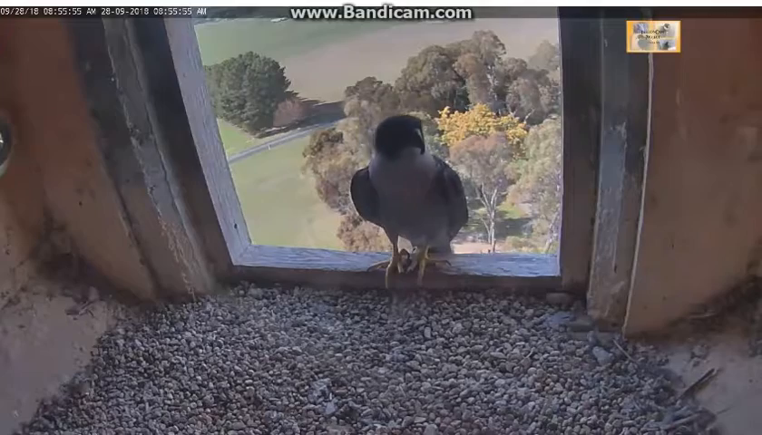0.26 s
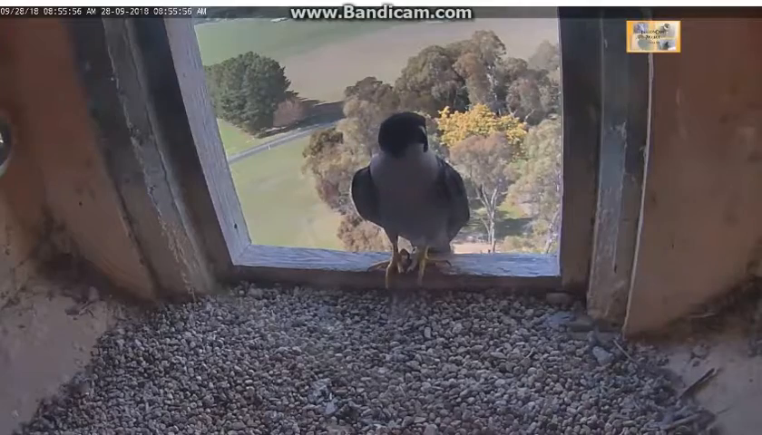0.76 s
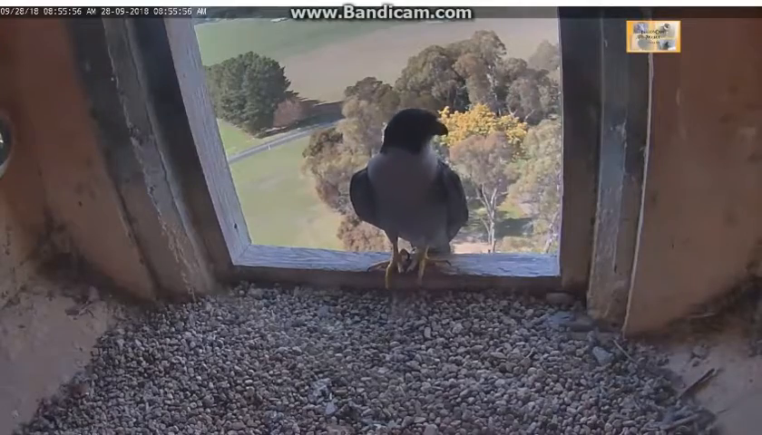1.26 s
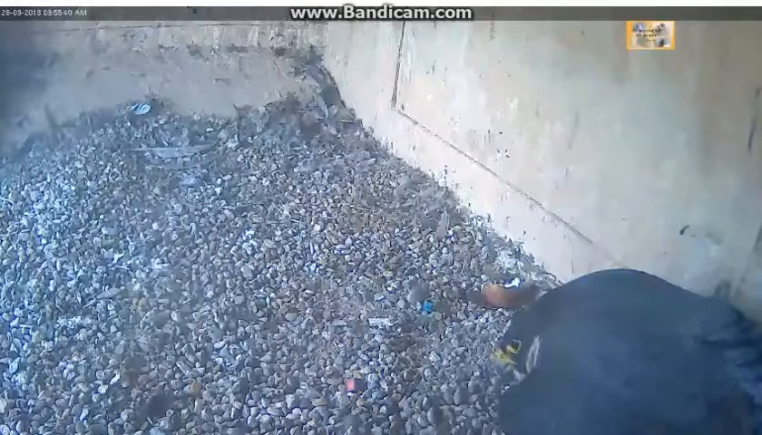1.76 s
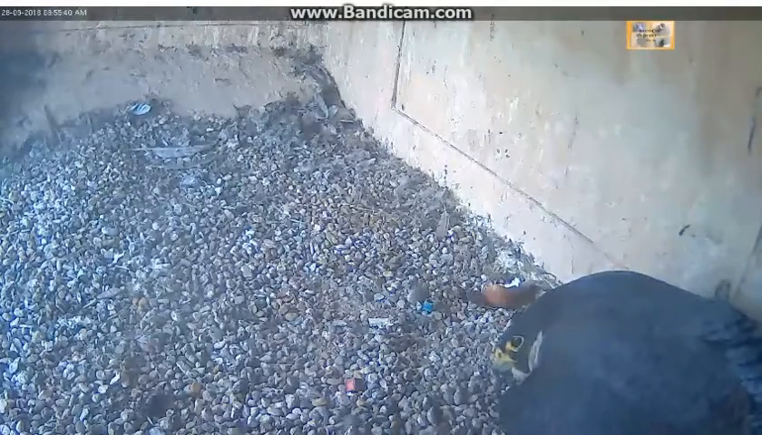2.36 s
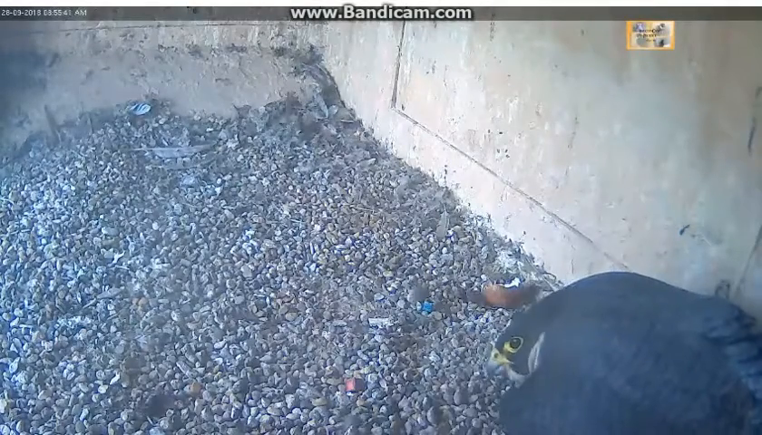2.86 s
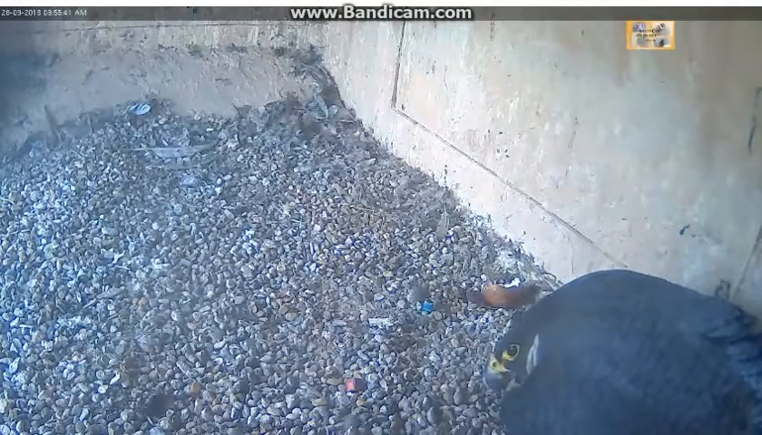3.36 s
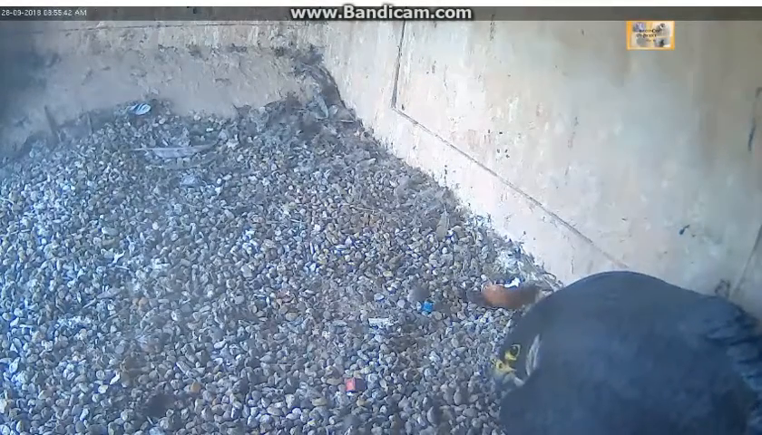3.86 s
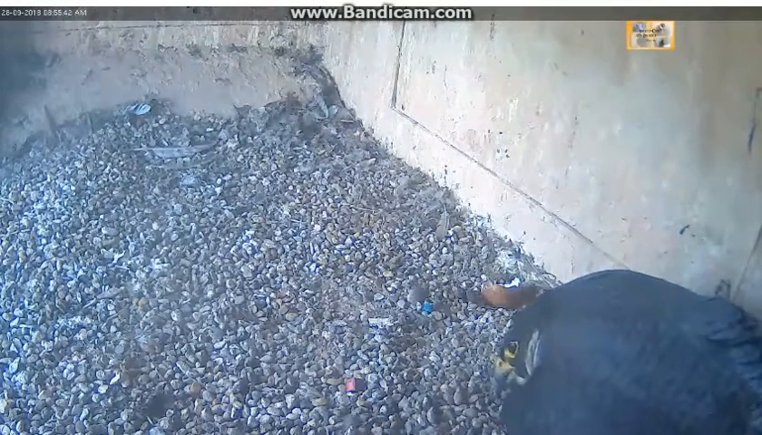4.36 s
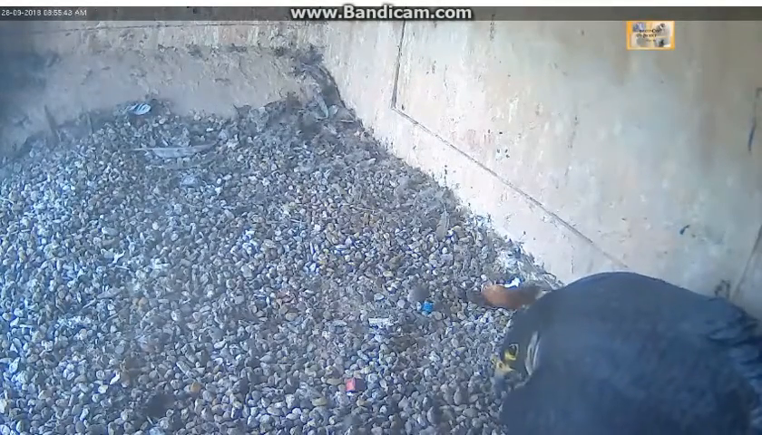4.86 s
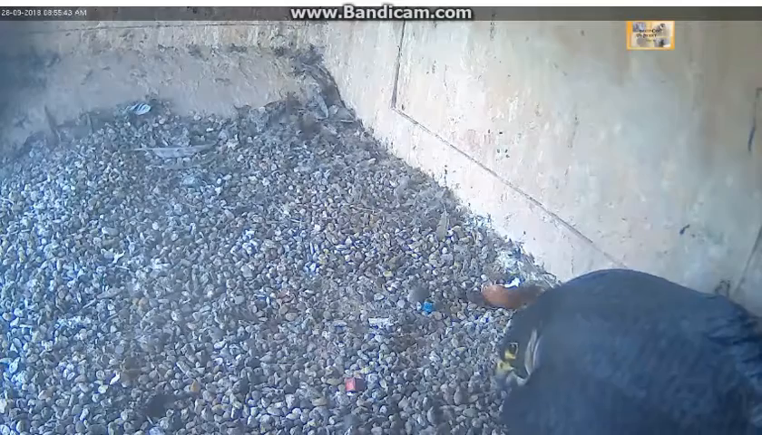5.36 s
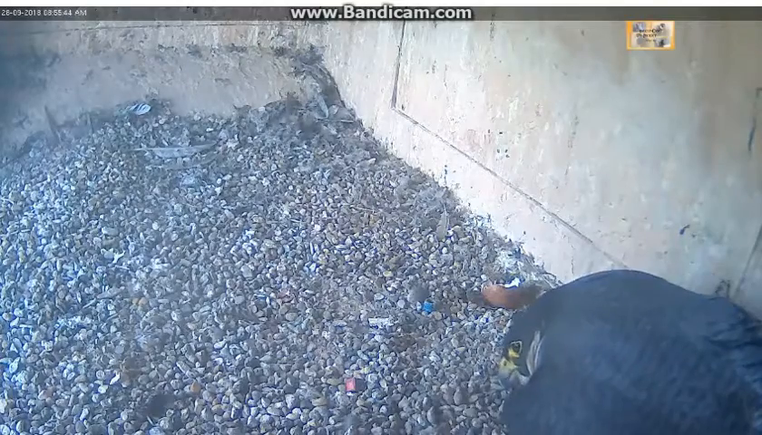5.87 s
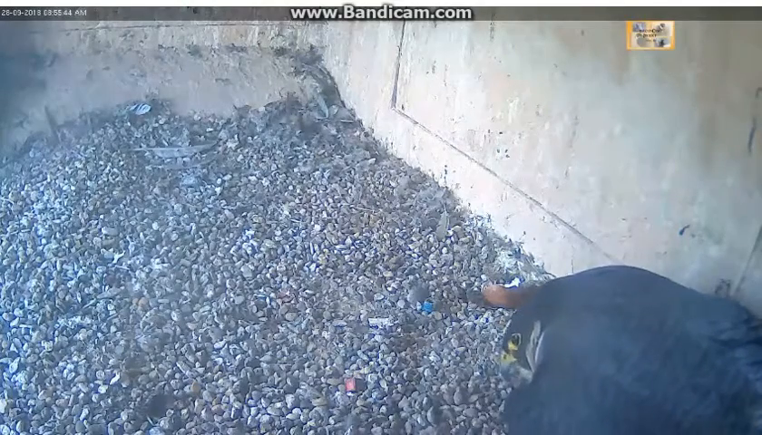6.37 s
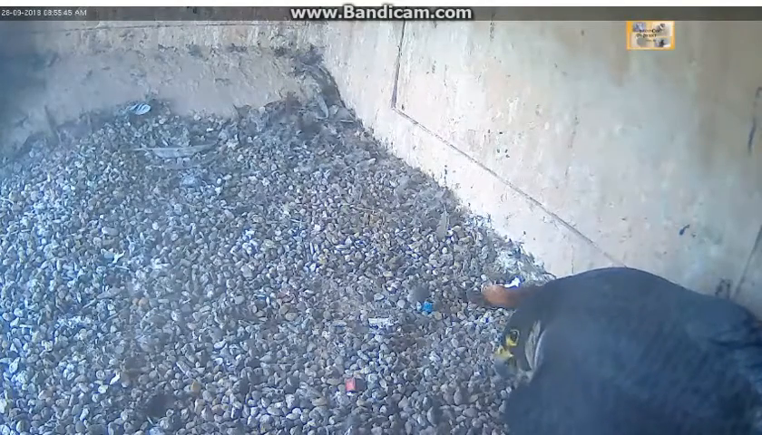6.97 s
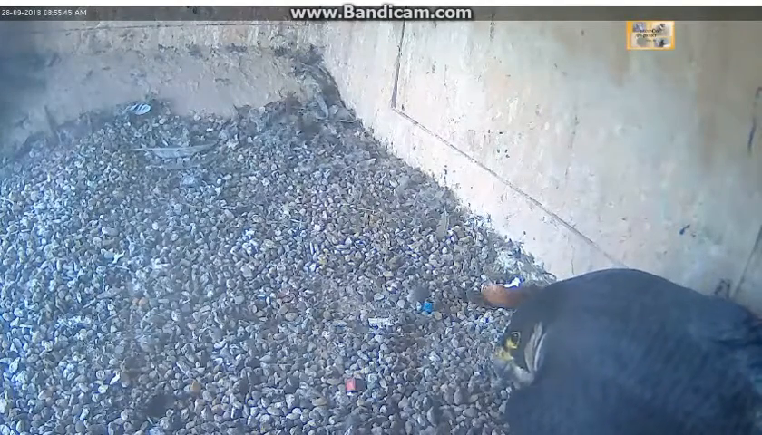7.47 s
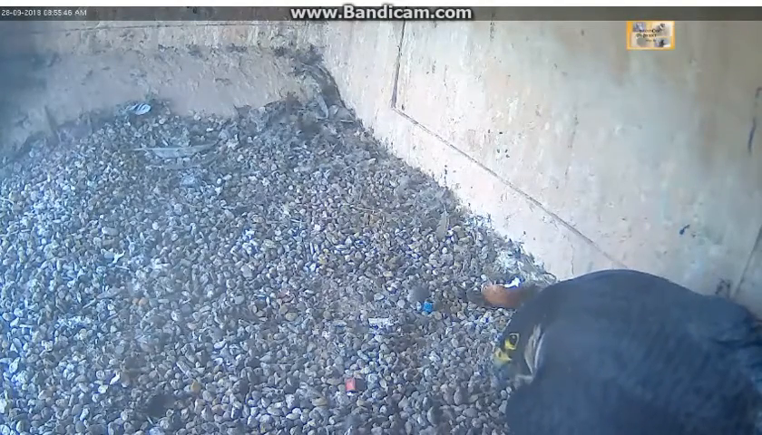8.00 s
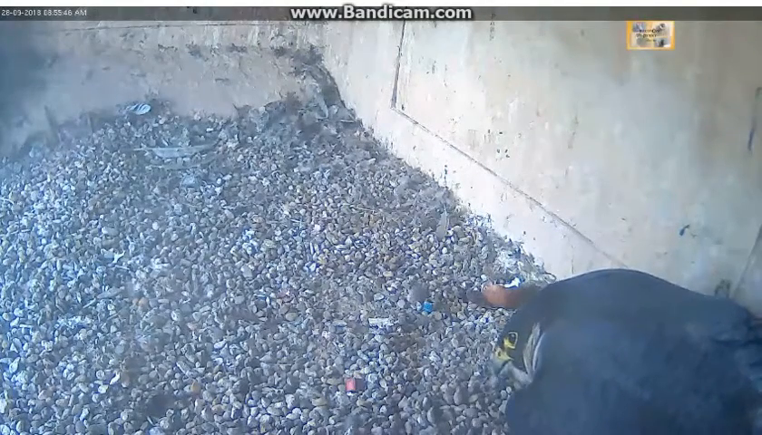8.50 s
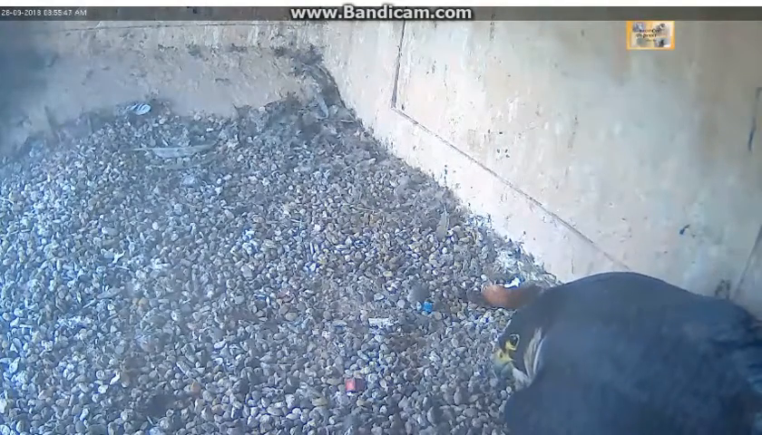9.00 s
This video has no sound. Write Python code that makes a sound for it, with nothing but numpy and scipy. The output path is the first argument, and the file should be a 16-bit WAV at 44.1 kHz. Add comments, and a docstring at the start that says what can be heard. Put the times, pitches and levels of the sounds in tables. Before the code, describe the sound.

Quiet air with one soft cry, then an abrupt switch to a falcon beside a small microphone in a nest box. Buzzing rasps come first, then harsh, piercing calls follow quickly until the end. Some begin with a low pulsed bark, others with a thin rising whistle; the pitch drops into a brief growl. Short close echoes, a slowly growing low hum and an uneven hiss accompany them.

```python
"""A falcon gives a run of sharp 'ee-chup' calls in a nest box, right beside a small microphone.
Some calls open with a low pulsed bark, most directly with a thin rising whistle; then the pitch
plunges and ends as a growl. It starts with one faint cry in quiet air; then the listening point jumps
close to the bird, which rasps a few times before the run. From there on a low hum and a ringing hiss
lie under the calls. Voices are harmonics and noise, whistles are sines, the background is coloured noise."""
import sys
import numpy as np
from scipy import signal
from scipy.fft import rfft, irfft, next_fast_len
from scipy.io import wavfile
from scipy.ndimage import uniform_filter1d, minimum_filter1d

SR = 44100
rng = np.random.default_rng(int(sys.argv[2]) if len(sys.argv) > 2 else 0)


def transcribe(u):
    """Save the signal u as a 16-bit wav file named by the first command-line argument.

    u: samples, shape (n,) or (channels, n), limited to [-1, 1]; the rate is SR.
    q: integer samples, one column per channel.
    """
    v = np.clip(np.atleast_2d(u).T, -1, 1)
    q = np.round(v * 32767).astype(np.int16)
    wavfile.write(sys.argv[1], SR, q)


N = 407484
TIME = np.arange(N) / SR
VOICE_TOP_HZ = 7900


def from_db(db):
    """Decibels to gain."""
    return 10 ** (np.asarray(db) / 20)


def rms_one(x):
    """Scale to rms 1."""
    return x / np.sqrt(np.mean(x ** 2) + 1e-20)


def gain_at(spectrum, hz):
    """Read the gain of a colour; beyond its ends it falls by 72 dB per octave."""
    points, db = np.transpose(spectrum)
    octave, edge = np.log2(np.maximum(hz, 1)), np.log2(points)
    beyond = np.abs(octave - np.clip(octave, edge[0], edge[-1]))
    return from_db(np.interp(octave, edge, db) - 72 * beyond)


def coloured(n, spectrum):
    """Noise of a given colour, rms 1."""
    size = next_fast_len(n)
    white = rfft(rng.standard_normal(size))
    shaped = white * gain_at(spectrum, np.fft.rfftfreq(size, 1 / SR))
    return rms_one(irfft(shaped, size)[:n])


def wander(t, rate):
    """Smooth chance through a short note, with `rate` new values a second."""
    return np.interp((t - t[0]) * rate, np.arange(512), rng.standard_normal(512))


def resonate(x, hz, width):
    """One resonance, gain 1 on top."""
    r = np.exp(-np.pi * width / SR)
    feed = np.array([1, 0, -1]) * (1 - r * r) / 2
    feedback = [1, -2 * r * np.cos(2 * np.pi * hz / SR), r * r]
    return signal.lfilter(feed, feedback, x + 1e-18)


def sine_phase(pitch):
    """Add up a changing pitch in Hz to the phase of its wave."""
    return 2 * np.pi * np.cumsum(pitch) / SR


def add(track, t, note):
    """Mix a note in at its times."""
    at = np.round(t * SR).astype(int)
    inside = (at >= 0) & (at < N)
    track[at[inside]] += note[inside]


def span(start, end):
    """Sample times from start to end."""
    return np.arange(round(start * SR), round(end * SR)) / SR


def course(shape, start, length, jitter):
    """Stretch the course of a note over its length: times, unsteady pitch, gain."""
    share, hz, db = np.transpose(shape)
    knots = start + np.sort(share) * length
    t = span(knots[0], knots[-1])
    pitch = np.exp(np.interp(t, knots, np.log(hz)) + jitter * wander(t, 695.3))
    return t, pitch, from_db(np.interp(t, knots, db))


def arch(start, length, first, middle, last, swell_db, jitter, catch, edge_s, sag_db):
    """A tone on an arched pitch, unsteadiest where it starts and ends: times, phase, gain."""
    t = span(start - edge_s / 2, start + length + edge_s)
    u = np.clip(2 * (t - start) / length - 1, -1, 1)  # -1 at the start, 1 at the end
    pitch = middle + (last - first) / 2 * u + ((first + last) / 2 - middle) * u * u
    pitch = pitch * (1 + (jitter + catch * u ** 4) * wander(t, 1300))
    fade_in = np.clip((t - t[0]) / (1.2 * edge_s), 0, 1)
    fade_out = np.clip((t[-1] - t) / (2 * edge_s), 0, 1)
    gain = np.sin(np.pi / 2 * fade_in * fade_out) ** 2 * from_db(swell_db * u - sag_db * u * u)
    return t, sine_phase(pitch), gain


def syrinx(pitch, colour, rough, flicker_db=4.5, size=8192):
    """Pulses from the voice organ, with air noise let through on each cycle, shaped by the throat; rms 1."""
    phase, t = sine_phase(pitch), np.arange(len(pitch)) / SR
    pulses = 0
    for k in range(1, int(VOICE_TOP_HZ / pitch.min()) + 1):
        # each harmonic has its own delay and flickers on its own
        weight = gain_at(colour, k * pitch) * from_db(flicker_db * wander(t, 262.6))
        pulses = pulses + weight * np.cos(k * phase + rng.normal())
    # a pitch-dependent gain: higher moments are raised against lower ones
    pulses = pulses / np.sqrt(np.maximum(pitch.min() / pitch, .3))
    air = np.resize(coloured(size, colour), len(pitch)) * (1 + np.cos(phase))
    return rms_one(rms_one(pulses) + rough * rms_one(air))


def singing_noise(spectrum, tones):
    """Smooth noise with narrow noisy bands standing out of it; rms 1."""
    total = coloured(N, spectrum)
    for hz, width, db in tones:
        band = rng.standard_normal(N)
        for _ in range(2):
            band = resonate(band, hz, 1.3 * width)
        total = total + from_db(db) * rms_one(band)
    return rms_one(total)


# smooth noise of the quiet air, the hum and the hiss: (f/Hz, relative level/dB per Hz)
FAR_AIR_COLOUR = [(15, -29), (25, -14), (43, -3), (65, 1), (124, -8.5), (196, -1.5), (280, -10.5),
                  (373, -26.5), (522, -39.5), (926, -42), (1290, -28), (1460, -32.5), (3890, -32),
                  (5980, -23.5), (7600, -38), (9880, -71), (16700, -120)]
HUM_COLOUR = [(15, -37.5), (25, -18.5), (43, -14.5), (64, -4.5), (107, -15), (168, -5.5), (204, -12),
              (301, -2.5), (320, -10), (350, -9.5), (533, -35), (900, -40.5), (1170, -58), (1980, -120)]
HISS_COLOUR = [(530, -49.5), (900, -31), (1070, -22.5), (1390, -12.5), (1700, -16), (2000, -20),
               (2110, -10), (2200, -6), (2750, -13.5), (3620, -11), (4100, -25.5), (4810, -18.5),
               (5400, -24.5), (7050, -16), (7500, -40), (9750, -50.5), (16500, -120)]
# bands that sing in each: (f/Hz, width/Hz before the filter pair is set, level/dB against the smooth noise)
AIR_TONES = [(1250, 86, -30), (4740, 85, -21.5)]
HUM_TONES = [(273.1, 4.6, 0.5), (314, 8.2, -4)]
HISS_TONES = [(1422, 120, -9), (2213, 110, 0), (4300, 100, -14), (6000, 160, -19), (7270, 22, -9.5)]
# how loud the hiss is through time: (t/s, level/dB)
HISS_LEVEL = [(1.5, -47), (2.099, -51), (2.6, -44), (2.87, -51.5), (3.1, -43.5), (9.24, -47.5)]
CLOSE_S = 1.422  # the listening point jumps close
FAR_AIR_DB = -57
HUM_DB, HUM_RISE_DB_PER_S = -42, 0.74  # the level at CLOSE_S, and its slow growth


def background():
    """Faint air noise gives way to a slowly growing hum and an uneven hiss, all of them filtered noise."""
    s, hiss_db = np.transpose(HISS_LEVEL)
    hum_gain = from_db(HUM_DB + HUM_RISE_DB_PER_S * (TIME - CLOSE_S))
    near = hum_gain * singing_noise(HUM_COLOUR, HUM_TONES)
    near += from_db(np.interp(TIME, s, hiss_db)) * singing_noise(HISS_COLOUR, HISS_TONES)
    far = from_db(FAR_AIR_DB) * singing_noise(FAR_AIR_COLOUR, AIR_TONES)
    close = np.clip((TIME - CLOSE_S) / 0.0078, 0, 1)
    return close * near + (1 - close) * far


# tones at which the box rings on: (f/Hz, width/Hz, level/dB)
BOX_MODES = [(276.6, 15, 8.5), (324.2, 14.6, 8.5), (1433, 39, 8.5), (2122, 32.6, 10.5), (2960, 70, 5.5)]
# wall reflections cancel at the microphone: (f/Hz, width/Hz, depth 0-1)
BOX_DIPS = [(542, 424, 0.96), (1194, 75, 0.8), (2344, 260, 0.8), (3127, 48, 0.5)]
BOX_T60_S, BOX_DB = 0.057, -5.5  # time for the echo to fall by 60 dB, and its level


def box(x, size=16384):
    """Direct sound, a short dense echo from close walls, and a few modes that ring on."""
    t = np.arange(size) / SR
    echo = rng.standard_normal(size) * from_db(-60 * t / BOX_T60_S) * (t > .002)
    walls = signal.fftconvolve(x, echo / np.linalg.norm(echo))[:N]
    ringing = sum(from_db(db) * resonate(x, hz, width) for hz, width, db in BOX_MODES)
    heard = from_db(-0.65) * x + from_db(BOX_DB) * walls + ringing
    for hz, width, depth in BOX_DIPS:
        heard = heard - np.clip(depth, 0, 1) * resonate(heard, hz, width)
    return heard


JOINED_S = .2


def after_bark(start):
    """Whether a plunge follows a bark so soon that both belong to one call."""
    return any(0 < start - bark[0] < JOINED_S for bark in BARKS)


# colour of the breath: (f/Hz, level/dB)
PUFF_COLOUR = [(900, -19.5), (2200, -21.5), (3300, -13.5), (4200, -9.5), (5100, -21), (6100, 2),
               (7100, -6.5), (7900, -34.5)]
RISING_PUFF_DB, CRY_PUFF_DB = -25, -26.5  # at the start of a call without a bark, or of a cry


def puffs(rise_s=0.0016, decay_s=0.017, size=4096):
    """Breath hisses briefly as the syrinx locks on to a note; a puff before a cry is never set above its cry's
    level, one before a call has a fixed level."""
    out, t = np.zeros(N), np.arange(size) / SR
    catches = [(start - lead, RISING_PUFF_DB)
               for start, _, _, _, lead, _ in CHUPS if not after_bark(start)]
    catches += [(start, min(CRY_PUFF_DB, db)) for start, _, _, depth, db in CRIES if depth > 0]
    for start, db in catches:
        swell = np.minimum(t / rise_s, 1) * np.exp(-t / decay_s)
        add(out, start + t, from_db(db) * swell * coloured(size, PUFF_COLOUR))
    return out


# lower arched cries: (t/s, length/s, mid pitch f/Hz, depth of the arch as share of pitch, level/dB)
CRIES = [(.001, 0.073, 2300, 0.01, -49), (1.727, 0.031, 2220, 0.13, -32.5),
         (1.795, 0.019, 2030, 0.15, -30.5), (2.09, 0.071, 2487, .055, -24.5),
         (2.186, 0.046, 2092, 0.06, -26.5), (2.448, 0.067, 2427, 0.17, -20.5),
         (2.785, 0.033, 2780, 0, -2.5), (2.817, 0.045, 2594, 0, -25.5), (2.985, 0.088, 2365, .18, -21.5),
         (3.432, 0.049, 2790, 0.01, -13), (5.205, 0.069, 2482, .1, -10), (6.137, 0.028, 2393, 0.04, -25),
         (6.598, 0.074, 2385, 0.15, -15.5), (7.161, 0.014, 2720, 0.01, -7), (7.169, 0.021, 2315, 0, -16.5),
         (8.541, 0.035, 2810, 0.03, -31)]
# the throat during a cry: (f/Hz, level/dB)
CRY_THROAT = [(2050, -3.5), (2450, 1.5), (2800, 0), (4100, 0), (4900, -1), (5500, 5), (6200, 5.5),
              (7100, 3.5), (7450, -8.5), (7800, -21)]
CRY_FALL_HZ, CRY_SWELL_DB = 217, -3  # pitch drop from start to end; level step from first to second half


def cries(flutter_db=3.5, hoarse=0.15):
    """Up to three harmonics, lower than the whistles, follow a sinking arch with a hoarse edge."""
    out = np.zeros(N)
    for start, length, hz, depth, db in CRIES:
        ends, sink = hz * (1 - depth), CRY_FALL_HZ / 2
        t, phase, gain = arch(start, length, ends + sink, hz, ends - sink, CRY_SWELL_DB,
                              jitter=0.0024, catch=0.015, edge_s=0.0086, sag_db=7.0)
        # soft cries are the hoarse ones
        shimmer = 1 + hoarse * wander(t, 1800) * np.clip(-db / 20, 0, 1) ** 2
        for k in range(1, 4):
            if k * hz < VOICE_TOP_HZ:
                strength = gain_at(CRY_THROAT, k * hz) * from_db(db + flutter_db * wander(t, 204.5))
                add(out, t, gain * shimmer * strength * np.sin(k * phase))
    return out


# hoarse notes: (t/s, length/s, pitch ratio, level/dB)
RASPS = [(1.446, 0.041, 0.91, -19.5), (1.538, .057, 1, -17), (1.64, 0.058, 0.97, -17),
         (1.691, 0.033, 0.69, -27.5), (1.742, .077, .96, -19.5), (1.838, .032, .92, -25),
         (3.824, .03, .88, -18), (3.846, 0.034, 1.29, -21), (5.19, 0.02, 0.91, -21),
         (6.587, .017, 1.09, -25.5)]
# the course of a rasp: (share of its length, f/Hz before the pitch ratio, relative level/dB)
RASP_COURSE = [(-.08, 747, -26.5), (.08, 832.4, -5), (.4, 904.4, -5), (.63, 1004, 3), (.85, 930, -2.5),
               (1.0, 779, -16), (1.2, 672, -20)]
# the throat in a rasp; the chest in rasps, barks and growls: (f/Hz, level/dB)
HOARSE_THROAT = [(650, -45), (880, -22), (1150, -7.5), (1450, -2), (1900, -0.5), (2400, -12), (2970, 6.5),
                 (3500, -5.5), (4000, -13), (4700, -23), (6000, -16.5), (6700, -31), (7700, -48)]
CHEST = [(90, -34), (160, -3), (250, 1.3), (320, -6.5), (400, -8.5), (520, -22), (700, -32.5)]
# chest against the rasp's level; it sounds more strongly in a lower rasp
RASP_CHEST_DB, RASP_CHEST_DB_PER_OCTAVE = -13, -25


def rasps():
    """Hoarse arched notes; every third cycle is strong, which gives a low buzz."""
    out = np.zeros(N)
    for start, length, ratio, rasp_db in RASPS:
        chest_db = rasp_db + RASP_CHEST_DB + RASP_CHEST_DB_PER_OCTAVE * np.log2(ratio)
        t, pitch, gain = course(RASP_COURSE, start, length, jitter=0.024)
        buzz = ratio * pitch / 3
        throb = 1 + 0.37 * np.cos(sine_phase(buzz))
        add(out, t, gain * throb * from_db(rasp_db) * syrinx(ratio * pitch, HOARSE_THROAT, rough=0.37))
        add(out, t, gain * from_db(chest_db) * syrinx(buzz, CHEST, rough=0.09, flicker_db=-2.5))
    return out


# opening barks: (t/s, level/dB, clearness 0-1, delay t/s until a whistle breaks out)
BARKS = [(-.012, -42.5, 0.1, .03), (2.067, -14, 0, .03), (2.761, -11, 0.2, .03), (3.4, -10.5, 0.14, .03),
         (4.13, -10, 0.87, 0.031), (4.735, -12, 0.96, 0.048), (5.337, -10, 0.94, 0.027),
         (6.067, -12.5, 0.95, 0.032), (7.083, -11.5, 1, 0.033), (7.759, -11, 1, .03),
         (8.477, -11.5, 0.42, 0.046)]
# the course of a bark: (share of its length, f/Hz, relative level/dB)
BARK_COURSE = [(-.2, 276.8, -41.5), (.04, 286.3, -9.5), (.2, 320.2, -3), (.42, 360.4, -3.5),
               (.54, 1297, 2.5), (.7, 1420, 1.5), (.9, 1496, -13.5), (1.4, 1525, -17)]
# it ends near the second harmonic of its top pitch: (share of its length, f/Hz, relative level/dB)
BARK_TONE = [(.55, 2886, -19), (.8, 2930, -1.5), (1.1, 3005, -0.5), (1.5, 3060, -10), (2.1, 2890, -24.5)]
# the throat in barks and growls: (f/Hz, level/dB)
THROAT = [(500, -43), (700, -26), (1000, 5.5), (1200, -2.5), (1430, 0.3), (1800, 2), (2400, -26.5),
          (3000, 9), (3600, -6), (4700, -13.5), (6000, -4.5), (7200, -36), (7900, -42.5)]
BARK_S = .025
# closing tone against the bark's level; a dull bark loses tone
BARK_TONE_DB, DULL_TONE_LOSS_DB = 0.7, 13
# chest: base level, share of the bark's level that it follows, gain in a dull bark
BARK_CHEST_DB, CHEST_FOLLOWS, DULL_CHEST_DB = -14, 0.25, 3.5


def barks():
    """A few slow pulses, then the pitch leaps up and a clear tone takes over."""
    out = np.zeros(N)
    for start, rasp_db, clear, _ in BARKS:
        chest_db = BARK_CHEST_DB + CHEST_FOLLOWS * rasp_db + DULL_CHEST_DB * (1 - clear)
        tone_db = rasp_db + BARK_TONE_DB - DULL_TONE_LOSS_DB * (1 - clear)
        t, pitch, gain = course(BARK_COURSE, start, BARK_S, jitter=0.035)
        add(out, t, gain * from_db(rasp_db) * syrinx(pitch, THROAT, rough=0.31, flicker_db=3.0))
        add(out, t, gain * from_db(chest_db) * syrinx(pitch, CHEST, rough=0.12, flicker_db=3.0))
        t, pitch, gain = course(BARK_TONE, start, BARK_S, jitter=.003)
        add(out, t, gain * from_db(tone_db) * np.sin(sine_phase(pitch)))
    return out


# whistle shapes: (start f/Hz, middle f/Hz, end f/Hz, level step/dB from first to second half)
ARCHED_WHISTLE = (4560, 4690, 4480, 1.5)  # breaks out of a bark
SAGGING_WHISTLE = (4520, 4338.5, 4597.5, -1.5)  # bridges from a bark to its plunge
RISING_WHISTLE = (4340, 4660, 4730, 7)  # starts a call that has no bark; pitches before the note's ratio
BARK_WHISTLE_S, BARK_WHISTLE_DB = .038, -2.5  # set length, and level against a fully clear bark
WHISTLE_GAP_S = 0.0015  # the set length ends just before the crack; the fade runs on through it


def whistle_notes():
    """Whistles break out of clear barks and lead into plunges: start, length, three pitches, swell, gain."""
    for start, db, clear, delay in BARKS:
        strength = from_db(db + BARK_WHISTLE_DB) * np.clip(clear, 0, 1) ** 3
        yield start + delay, BARK_WHISTLE_S, *ARCHED_WHISTLE, strength
    for start, ratio, _, _, lead, db in CHUPS:
        if lead > 2 * WHISTLE_GAP_S:
            joined = after_bark(start)
            *pitches, swell_db = SAGGING_WHISTLE if joined else RISING_WHISTLE
            pitches = np.array(pitches) * (1 if joined else ratio)
            yield start - lead, lead - WHISTLE_GAP_S, *pitches, swell_db, from_db(db)


def whistles(flutter_db=5.0):
    """Nearly pure high tones: single sines with slightly unsteady pitch and fluttering level."""
    out = np.zeros(N)
    for *shape, strength in whistle_notes():
        t, phase, gain = arch(*shape, jitter=0.0068, catch=0.011, edge_s=0.0068, sag_db=0.5)
        flutter = from_db(flutter_db * wander(t, 120))
        add(out, t, gain * strength * flutter * np.sin(phase))
    return out


# plunging notes and the whistle that leads into each, if its length is not near zero:
# (t/s, pitch ratio, level/dB, hoarseness: 0 clear and 1 hoarse, whistle length/s, whistle level/dB)
CHUPS = [(1.428, .86, -11.5, 0.08, 0, -69), (2.41, .91, -8.5, 0.1, 0.045, -18),
         (2.918, 0.95, -12.5, 0.34, 0.067, -27), (3.13, 0.96, -10, 0.19, 0.047, -20),
         (3.542, 0.91, -11.5, 0.26, 0.076, -19), (3.755, 0.98, -10.5, 0, 0.043, -21.5),
         (4.267, 0.81, -15.5, 0.18, .089, -23.5), (4.48, 1, -11, 0, .055, -20.5),
         (4.829, 0.81, -12, 0.9, 0.0067, -63), (5.035, 0.99, -13, 0, 0.048, -17),
         (5.466, 0.9, -10.5, 0.62, .069, -22.5), (5.718, 0.99, -12, 0.11, 0.053, -24),
         (6.404, .98, -11.5, .25, 0.051, -18.5), (6.77, 1, -11.5, 0.16, .057, -20.5),
         (7.174, .93, -20, 1.2, 0, -63), (7.412, .96, -11, 0.24, 0.05, -22.5),
         (7.873, .92, -9.5, 0.62, 0.044, -19.5), (8.122, .99, -12, .12, 0.047, -19.5),
         (8.594, .86, -12, 0.87, 0.057, -19), (8.868, 1, -12.5, 0.01, 0.049, -19.5)]
# the course of a plunge: (share of the fall time, f/Hz before the pitch ratio, relative level/dB)
PLUNGE_COURSE = [(-.32, 1555, -27.5), (-.15, 1488, 0), (0, 1335, 5), (.14, 1244, 4.5), (.32, 1195, 1.5),
                 (.55, 1123, -1.5), (.78, 1089, -10.5), (1.0, 1052, -46.5)]
# the course of the growl that ends it: (share of the fall time, f/Hz, relative level/dB)
GROWL_COURSE = [(.55, 893.6, -18.5), (.75, 513.8, 0.5), (1.0, 299.5, 1.5), (1.25, 237.7, -7),
                (1.55, 185, -9.5), (1.9, 165.2, -47.5)]
# colours of the plunge's middle and treble: (f/Hz, level/dB)
PLUNGE_MIDDLE = [(900, -29), (1250, -24), (1700, -32.5), (2120, 5), (2800, 0.5), (3300, -6.5), (3850, 14.5),
                 (4500, 0), (5200, 3.5), (5700, -31.5)]
PLUNGE_TREBLE = [(4800, -43.5), (5400, -2.5), (6050, 16.5), (6600, 6.5), (7200, 2.5), (7900, -35.5)]
# a row each for middle, treble, growl rasp and growl chest, against the note's level:
# (level/dB when clear, level/dB when hoarse)
PLUNGE_MIX = [(0.4, -4), (3.5, -9), (-14.5, -1.5), (-21, -5.5)]
FALL_S, FALL_POWER = .0355, 2.3  # fall time at pitch ratio 1; a higher note takes longer to fall
CRACK_HZ = 3980  # pitch of the snapping whistle at the crack, before jitter


def chups(crack_db=-6.5, crack_s=0.0087):
    """The voice cracks into a dense stack that plunges until single pulses are heard as a growl."""
    out = np.zeros(N)
    clear_db, hoarse_db = np.transpose(PLUNGE_MIX)
    for start, ratio, db, hoarse, _, _ in CHUPS:
        fall = FALL_S * ratio ** FALL_POWER
        middle_db, treble_db, rasp_db, chest_db = db + clear_db + hoarse * (hoarse_db - clear_db)
        t, pitch, gain = course(PLUNGE_COURSE, start, fall, jitter=0.014)
        middle = syrinx(ratio * pitch, PLUNGE_MIDDLE, rough=0.14, flicker_db=8.5)
        add(out, t, gain * from_db(middle_db) * middle)
        # a whistle snaps downwards through the crack
        snap = np.exp(-((t - start + 0.00058) / crack_s) ** 2)
        snap_pitch = CRACK_HZ * pitch / PLUNGE_COURSE[2][1]
        add(out, t, snap * from_db(middle_db + crack_db) * np.sin(sine_phase(snap_pitch)))
        # the treble opens around the crack and is full just after it
        opened = np.clip((t - start + 0.0081) / 0.015, 0, 1)
        treble = syrinx(ratio * pitch, PLUNGE_TREBLE, rough=0.16, flicker_db=1.0)
        add(out, t, gain * opened * from_db(treble_db) * treble)
        t, pitch, gain = course(GROWL_COURSE, start, fall, jitter=0.0717)
        add(out, t, gain * from_db(rasp_db) * syrinx(pitch, THROAT, rough=0.38, flicker_db=2.5))
        # the power below 1 lets the chest swell and fade more gently
        add(out, t, gain ** 0.48 * from_db(chest_db) * syrinx(pitch, CHEST, rough=0.072, flicker_db=3.0))
    return out


BODY_LOW_HZ = 145


def scene():
    """The bird in its box, over the background; so small a body radiates no deep bass."""
    bird = whistles() + cries() + chups() + barks() + rasps() + puffs()
    bird = signal.sosfilt(signal.butter(4, BODY_LOW_HZ, "high", fs=SR, output="sos"), bird)
    return (box(bird) + background())[None]


LIMIT, LIMIT_RELEASE_S = 0.92, .004  # peak level that the limiter aims at, and its smoothing time
BAND_TOP_HZ, CUTOFF_HZ = 7550, 16000


def record(dry):
    """A narrow-band microphone with a fast limiter; the last overshoots clip."""
    size = max(int(LIMIT_RELEASE_S * SR), 2)
    needed = LIMIT / np.maximum(np.abs(dry), LIMIT)
    gain = uniform_filter1d(minimum_filter1d(needed, size // 2), size)
    narrow = signal.sosfilt(signal.ellip(8, .3, 80, BAND_TOP_HZ, fs=SR, output="sos"), gain * dry)
    clipped = np.clip(narrow, -1, 1)
    return signal.sosfilt(signal.cheby2(12, 70, CUTOFF_HZ, fs=SR, output="sos"), clipped)


dry = scene()
out = record(dry)
transcribe(out)
```